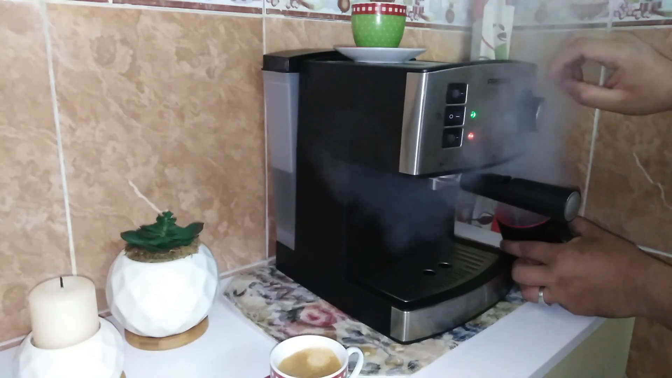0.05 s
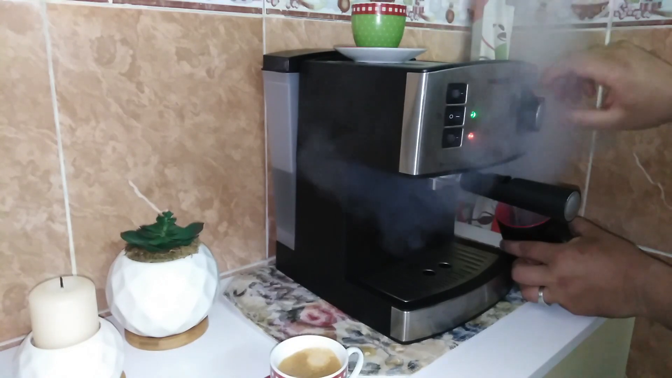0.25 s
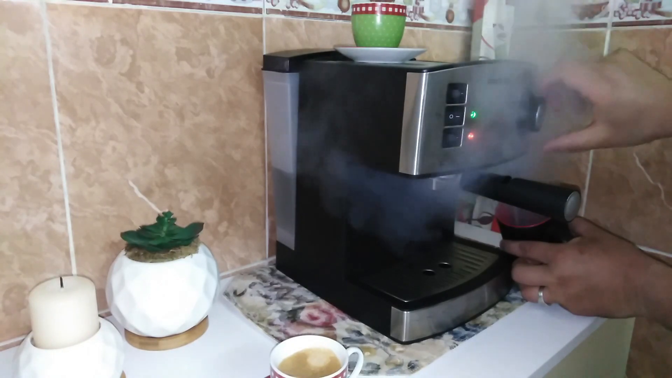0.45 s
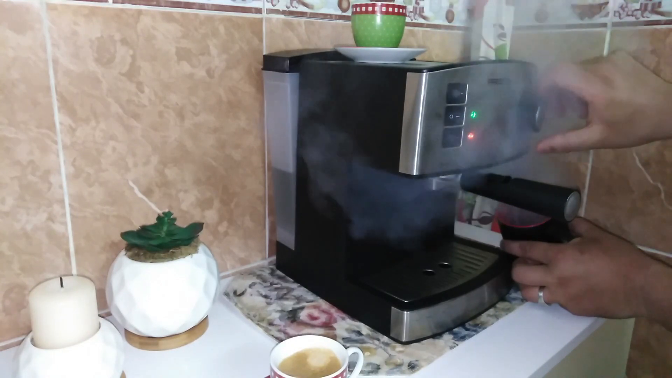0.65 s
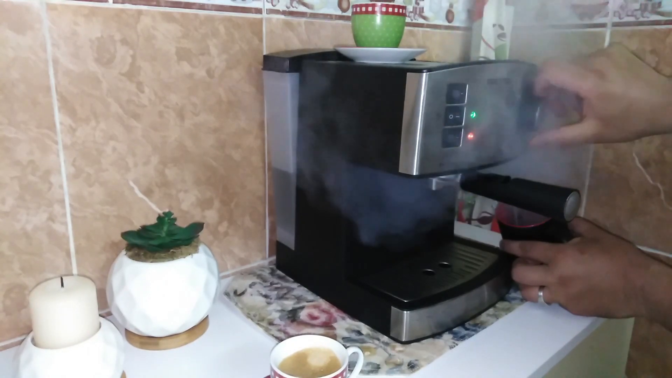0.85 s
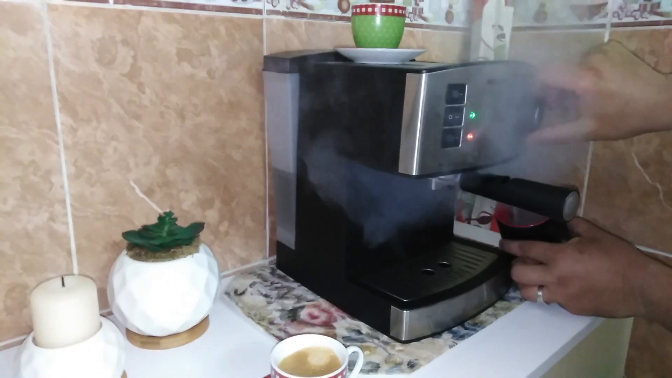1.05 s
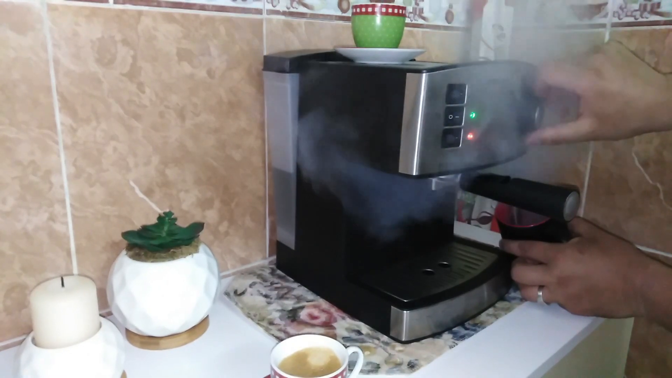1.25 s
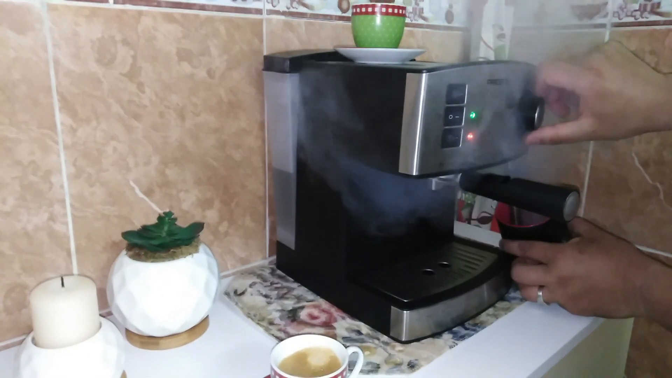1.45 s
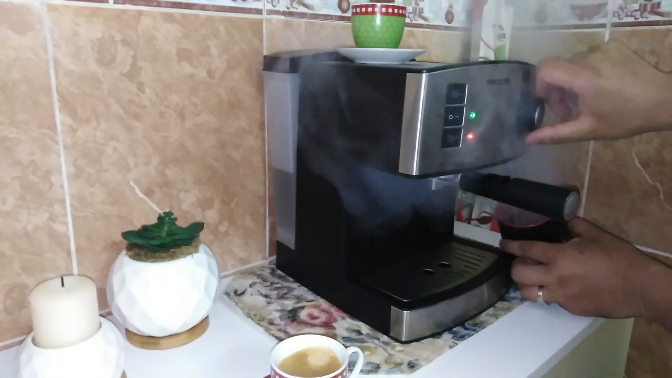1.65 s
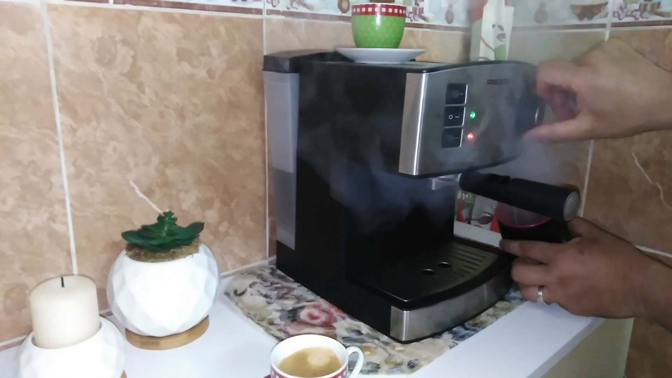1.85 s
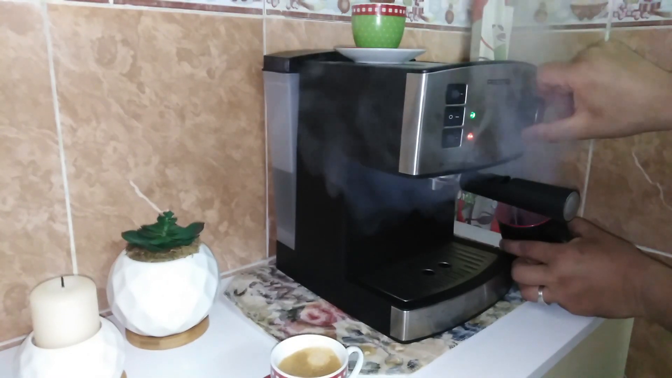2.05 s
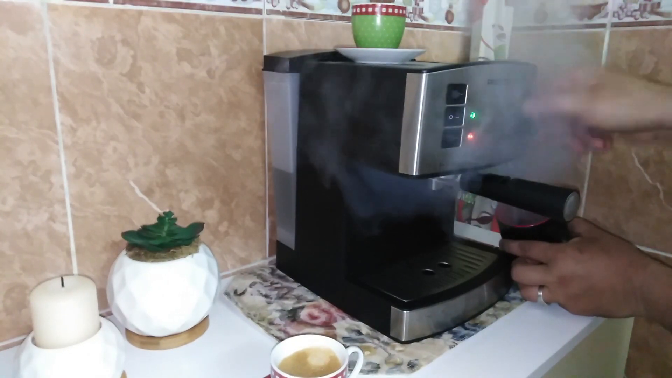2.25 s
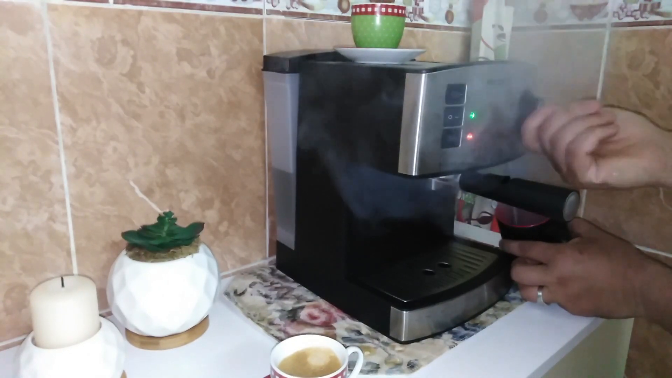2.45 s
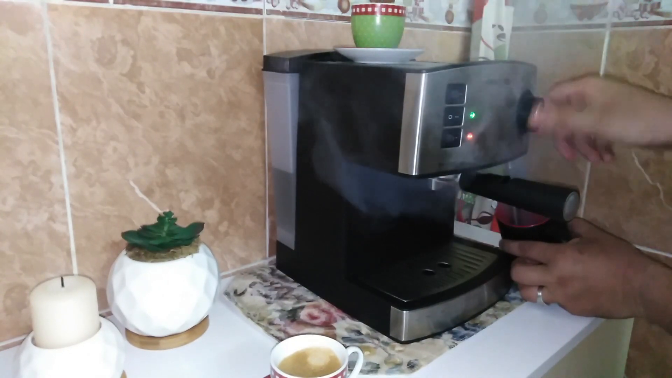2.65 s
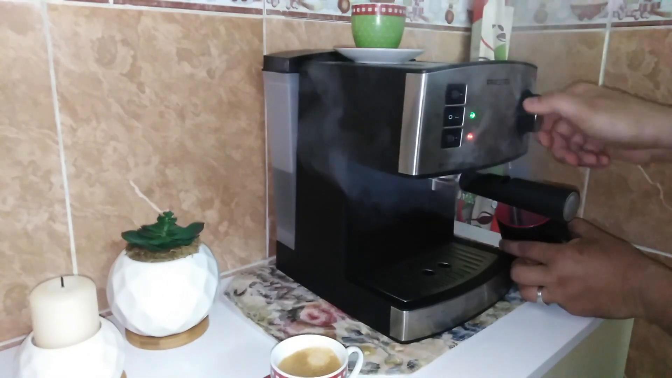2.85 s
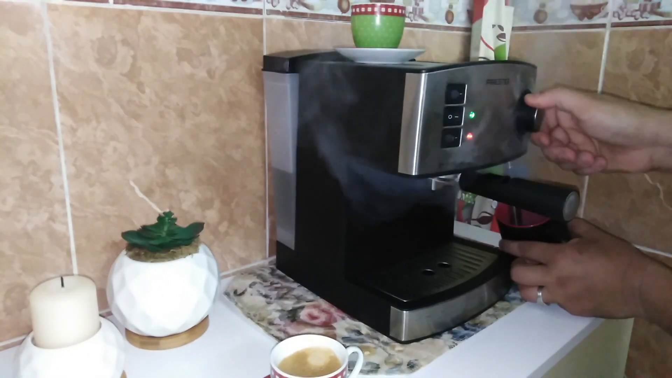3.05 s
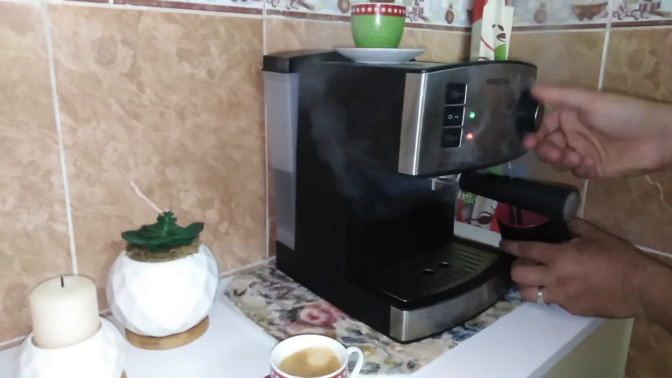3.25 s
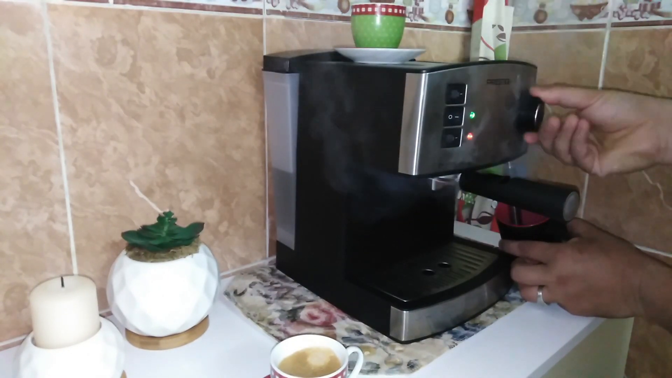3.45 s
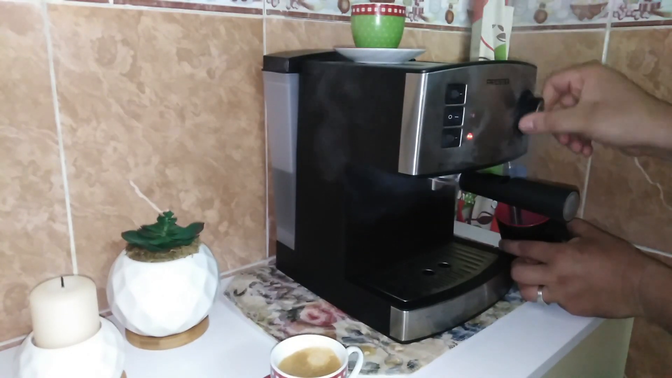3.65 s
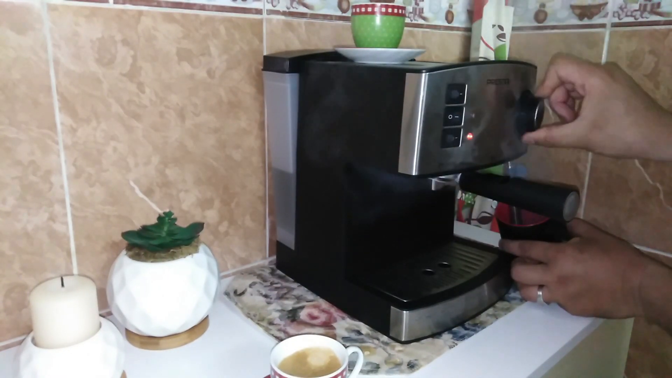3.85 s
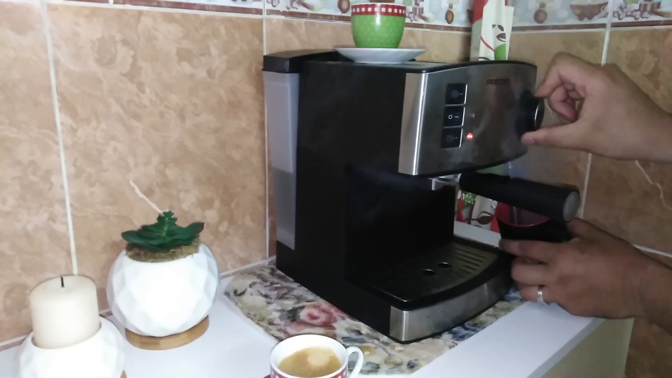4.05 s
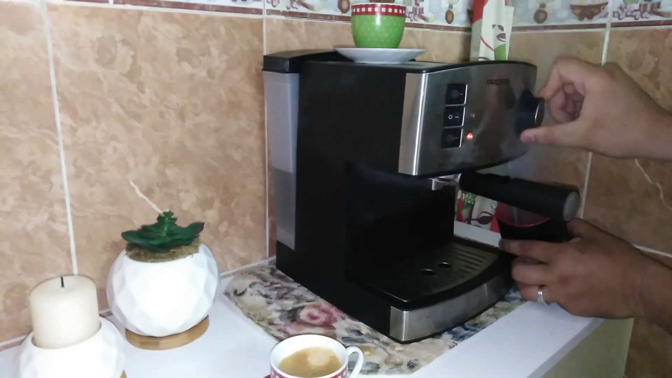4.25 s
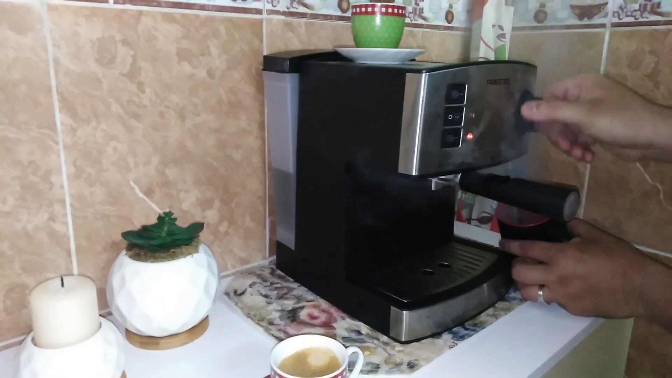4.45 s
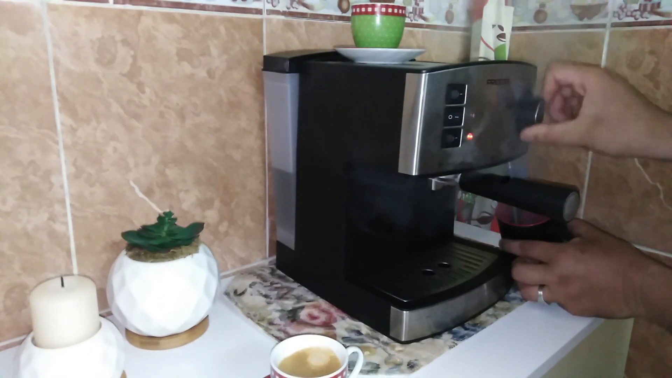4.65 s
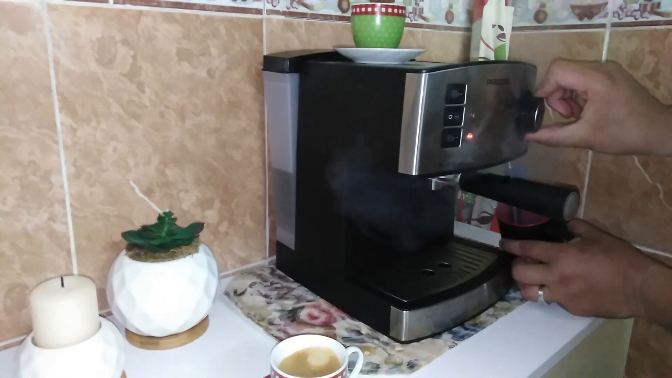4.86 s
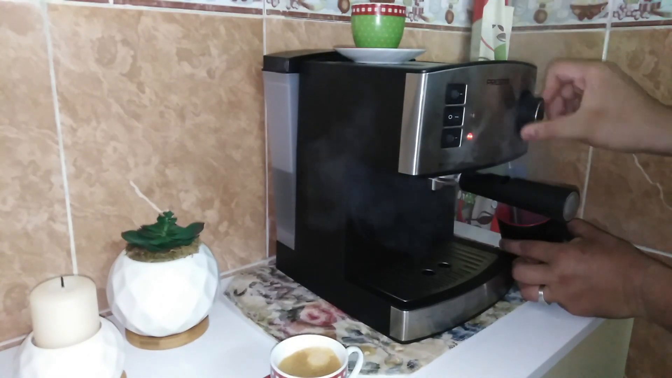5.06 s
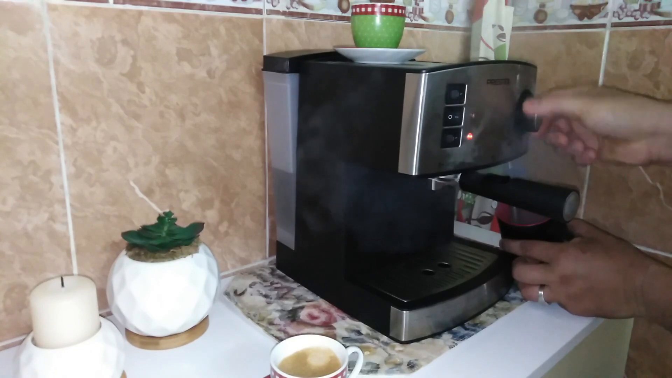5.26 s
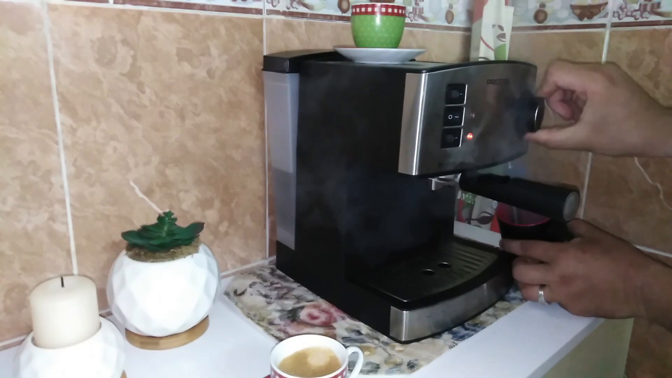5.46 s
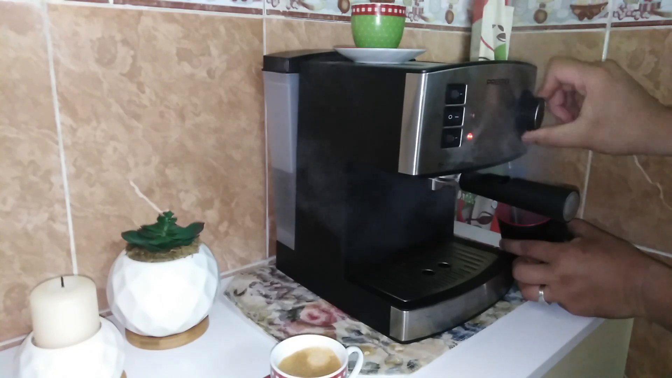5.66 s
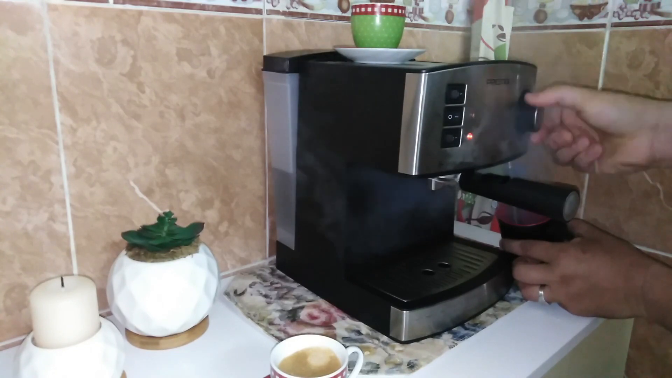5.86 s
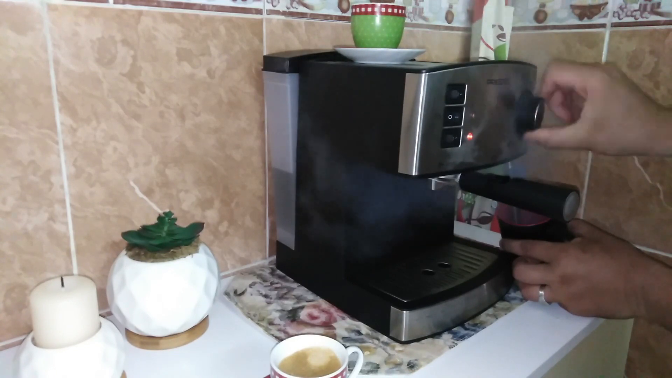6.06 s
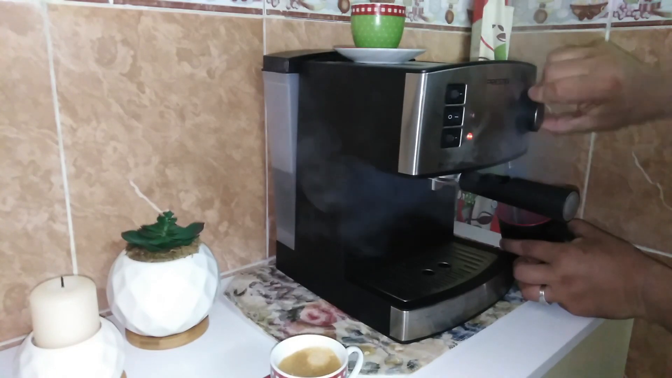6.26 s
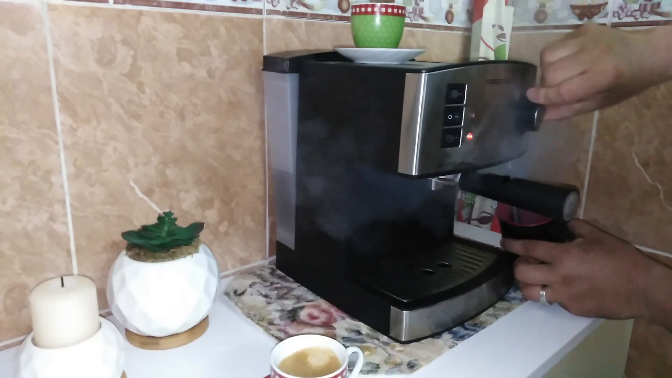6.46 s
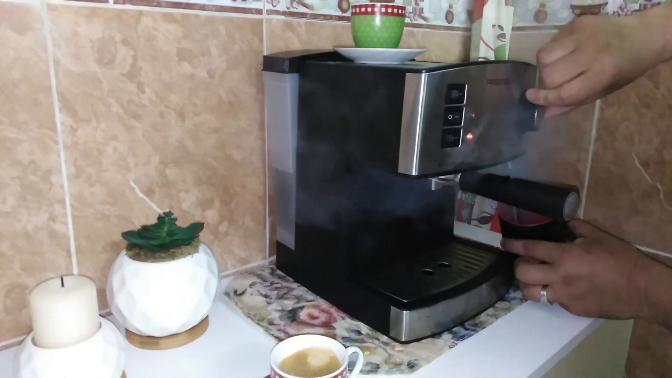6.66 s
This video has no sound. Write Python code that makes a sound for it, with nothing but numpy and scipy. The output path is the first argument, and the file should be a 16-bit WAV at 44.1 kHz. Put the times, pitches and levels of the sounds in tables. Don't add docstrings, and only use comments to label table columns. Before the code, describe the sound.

A loud steam jet hisses and whistles in a tiled kitchen, stops for dripping and a sharp knob snap, then returns in short bursts.

```python
import sys
import numpy as np
from scipy import signal
from scipy.fft import rfft, irfft, dct, next_fast_len
from scipy.io import wavfile
from scipy.ndimage import uniform_filter1d

SR = 44100
rng = np.random.default_rng(int(sys.argv[2]) if len(sys.argv) > 2 else 0)


def waveform_to_disk(signal):
    frames = np.transpose(np.atleast_2d(signal))
    scaled = np.clip(frames, -1, 1) * 32767
    samples = np.round(scaled).astype(np.int16)
    wavfile.write(sys.argv[1], SR, samples)


def convert_level_to_amplitude(level_db):
    exponent = np.asarray(level_db, float) / 20
    return 10 ** exponent


N = 295911
SNAP_S = 3.4368


def clock():
    return np.arange(N) / SR


def rms_one(x):
    return x / np.sqrt(np.mean(x ** 2) + 1e-20)


def at_hz(points, hz):
    table = np.array(points)
    return np.interp(np.log(hz + 1), np.log(table[:, 0]), table[:, 1])


def coloured(x, points, share=1):
    size = next_fast_len(x.shape[-1])
    hz = np.arange(size // 2 + 1) * SR / size
    spectrum = rfft(x, size) * convert_level_to_amplitude(share * at_hz(points, hz))
    return irfft(spectrum, size)[..., :x.shape[-1]]


def band_pass(x, band_hz, kind="band"):
    return signal.sosfilt(signal.butter(2, band_hz, kind, fs=SR, output="sos"), x)


def drift(rate):
    r = np.exp(-80 * np.pi * rate / SR)
    white = rng.standard_normal(N // 40 + 2002)
    slow = signal.lfilter([1], [1, -2 * r, r * r], white)[2000:]
    return np.interp(np.arange(N) / 40, np.arange(len(slow)), rms_one(slow))


def resonant_noise(modes, patchy_db):
    out, white = 0, rng.standard_normal((2, 3, N))
    for k, (hz, width_hz, level_db) in enumerate(modes):
        r = np.exp(-np.pi * width_hz / SR)
        poles = [1, -2 * r * np.cos(2 * np.pi * hz / SR), r * r]
        band = signal.lfilter([1, 0, -1], poles, white[k % 2])
        out = out + convert_level_to_amplitude(level_db + patchy_db * drift(19.4)) * rms_one(band)
    return out


def place(sound, start_s):
    out, at = np.zeros(N), round(start_s * SR)
    out[at:at + len(sound)] = sound[:N - at]
    return out


def ring(start_s, peak_db, hz, t60, rough=0, rise=0.00029):
    t = np.arange(round(.3 * SR)) / SR
    wobble = 1 + rough * uniform_filter1d(rng.standard_normal(len(t)), size=160) * 12
    envelope = convert_level_to_amplitude(peak_db - 60 * t / t60) * (1 - np.exp(-t / rise))
    return place(envelope * wobble * np.sin(2 * np.pi * hz * t), start_s)


def burst(start_s, peak_db, t60, band_hz):
    t = np.arange(round(.3 * SR)) / SR
    puff = convert_level_to_amplitude(peak_db - 60 * t / t60) * rng.standard_normal(len(t))
    return place(band_pass(puff, band_hz), start_s)


def hush():
    t = clock()
    from_s, fall_db_per_s = 3.17, 130
    return convert_level_to_amplitude(-fall_db_per_s * np.clip(t - from_s, 0, None) * (t < SNAP_S))


# open_s, unseat_time_s, shut_start_s, shut_time_s, jet_level_db
VALVE_TURNS = [
    (-1, .05, 2.37, .16, -8.9),
    (3.795, .02, 4.45, .025, -10.1),
    (4.714, .011, 5.165, .02, -9.8),
    (5.424, .004, 5.835, .02, -10),
    (6.098, .012, 7.5, .02, -10.3),
]


def flow(follows):
    t, out = clock(), 0
    unseat_share, full_s, sag_db_per_s = .6, .045, .7
    for opens, unseat_s, shuts, shutting_s, level_db in VALVE_TURNS:
        jump = np.clip((t - opens) / unseat_s, 0, 1)
        growth = np.clip((t - opens) / full_s, 0, 1) ** 2
        travel = unseat_share * jump + (1 - unseat_share) * growth
        closing = np.clip((shuts + shutting_s - t) / shutting_s, 0, 1) ** 2
        pressure = convert_level_to_amplitude(level_db - sag_db_per_s * (t - max(opens, 0)))
        out = out + travel ** follows * closing * pressure
    return out


# pitch_hz, level_db (per Hz)
RUMBLE_COLOUR = [(60, -33), (100, -16), (122, 2), (140, -3.5), (200, -6.5), (270, -12), (330, -14),
                 (430, -20), (520, -14), (700, -38.5)]
# pitch_hz, level_db (per Hz)
DEEP_COLOUR = [(15, -41), (30, -14), (45, -3.5), (60, 0), (80, 4.5), (110, -34)]
# peak_time_s, peak_db, length_s
SHUDDERS = [(0.0, -36, .02), (.2, -31, .06), (.4, -35, .1), (.64, -43, .06), (.9, -41, .05),
            (1.43, -40, .12), (2.06, -38, .06), (2.37, -39, .06), (2.6, -45, .1), (2.91, -43, .04),
            (2.97, -44, .04), (5.1, -37, .14), (6.15, -42, .04), (6.43, -44, .04), (5.7, -47, .15)]


def rumble():
    t = clock()
    opposite = np.array([[1], [-1]])
    mid, side = rms_one(coloured(rng.standard_normal((2, N)), RUMBLE_COLOUR))
    deep, deep_side = rms_one(coloured(rng.standard_normal((2, N)), DEEP_COLOUR))
    shudder = 0
    for peak_s, peak_db, length_s in SHUDDERS:
        span_s = length_s * np.where(t < peak_s, .4, 1)
        shudder = shudder + convert_level_to_amplitude(peak_db) * np.exp(-((t - peak_s) / span_s) ** 2)
    jet_on = flow(1) / flow(1).max()
    keep = np.exp(-1 / (.3 * SR))
    shaking = signal.lfilter([1 - keep], [1, -keep], jet_on, zi=[keep])[0]
    idle_db, shake_db, deep_db, shudder_deep_db = -56, -49, -63, -24
    steady = hush() * (convert_level_to_amplitude(idle_db) + convert_level_to_amplitude(shake_db) * shaking) * convert_level_to_amplitude(2.0 * drift(7.0))
    body = (steady + shudder) * convert_level_to_amplitude(-4.0 + 1.0 * drift(5.2)) * (mid + 0.23 * side * opposite)
    low = np.sqrt(hush()) * convert_level_to_amplitude(deep_db + 2.0 * drift(8.0)) + convert_level_to_amplitude(shudder_deep_db) * shudder
    return body + low * (deep + .45 * deep_side * opposite)


# pitch_hz, level_db (per Hz)
LEAK_COLOUR = [(200, -30), (350, -17), (721, -11.5), (838, -13.5), (1100, -17), (1420, -11.5), (1670, -22),
               (2280, -18.5), (6600, -33), (8000, -47), (10400, -68), (17600, -120)]


def leak():
    trickle = rms_one(coloured(rng.standard_normal((2, N)), LEAK_COLOUR)) * convert_level_to_amplitude(9.0 + 2.0 * drift(16))
    seep = coloured(rng.standard_normal((2, N)), JET_COLOUR)
    seep = rms_one(coloured(seep, [(10300, 0.5), (11500, -14)]))
    seep = seep * convert_level_to_amplitude(10.0 + 1.1 * drift(8.3))
    trickle_db, seep_db, fall_db, bleed_s = -54, -40, 58, .6
    pressure = 0
    for _, _, shuts, _, _ in VALVE_TURNS:
        since = clock() - shuts
        bled = 1 - np.exp(-np.abs(since) / bleed_s)
        pressure = pressure + (since > 0) * convert_level_to_amplitude(seep_db - fall_db * bled)
    return hush() * convert_level_to_amplitude(trickle_db) * trickle + pressure * seep


# start_s, peak_db, pitch_hz
KNOCKS = [(0.194, -28, 145), (0.377, -37, 145), (2.989, -24, 262), (3.47, -32, 290), (3.51, -33, 260),
          (3.69, -36, 270), (5.4, -36, 270), (4.691, -26.5, 264), (5.982, -27, 250), (6.002, -31, 253),
          (6.062, -29, 350)]
# pitch_hz, level_db, t60_s (time to fall 60 dB)
KNOB = [(340, -12, 0.054), (1153, -15.5, 0.089), (1974, -4, .025), (2520, 6, 0.011), (2980, 8, 0.0092),
        (4340, -8, 0.01), (5380, -6, 0.01), (7060, -16, .01)]


def hand():
    snap_db = -13
    knocks = sum(ring(s, peak_db, hz, 0.056, rough=.5, rise=.005) for s, peak_db, hz in KNOCKS)
    snap = sum(ring(SNAP_S, snap_db + db - 8.5, hz, t60, rough=0.3) for hz, db, t60 in KNOB)
    crack = burst(SNAP_S, snap_db - 1.5, .045, (1500, 5000))
    crack = crack + burst(SNAP_S, snap_db - 19, .3, (250, 4000))
    tick = burst(3.538, -30, .04, (3500, 12000))
    return knocks + snap + crack + tick


# start_s, peak_db, pitch_hz, metal_ping_db, thud_db
DROPS = [(2.5437, -30.5, 1435, 3, -4), (2.6503, -26.5, 1590, 3.5, -5), (2.7245, -32, 1344, -7, 1),
         (2.808, -23.5, 1454, -14, -24), (2.8969, -25, 1305, -0.5, -9), (2.9195, -25, 1390, -32, -13),
         (2.9771, -25, 1525, -5, -16), (3.0433, -41, 1600, 10, -4), (3.0722, -22.5, 1444, -10.5, -17),
         (3.1163, -42, 1440, -14, -2), (3.1625, -41, 1390, -7.5, -22.5), (3.2604, -64.5, 1450, 15.5, 24),
         (3.3298, -45, 1500, -7, -7), (3.4106, -50, 1410, -12, -7.5), (3.494, -32, 1416, -21, -29),
         (3.566, -23.5, 1445, -10.5, -19), (3.638, -49, 1440, -3, -13), (3.674, -25, 1433, -17, -18),
         (3.7433, -25.5, 1410, -12, -24), (5.3672, -31, 1423, -1.5, -7), (6.038, -35, 1434, 0.5, -2)]
# pitch_hz, level_db, t60_s (time to fall 60 dB)
PINGS = [(2480, 0, .1), (3300, -6, .05), (4600, -11, .2), (5600, -12, .04), (7450, -5, .08)]


def drops():
    out = np.zeros(N)
    for s, peak_db, hz, ping_db, thud_db in DROPS:
        out += ring(s, peak_db - 0.8, hz, 0.075, rough=0.45, rise=0.0034)
        out += ring(s, peak_db + thud_db + 4.5, 780, 0.035, rough=1.0, rise=.004)
        out += burst(s, peak_db + min(ping_db, 3.0) - 4.5, .14, (500, 3000))
        for wall_hz, wall_db, t60 in PINGS:
            wall_peak_db = peak_db + ping_db + wall_db - 9.5 + rng.normal(0, 0.78)
            out += ring(s, wall_peak_db, wall_hz, t60, rough=1.0, rise=0.0011)
    return out


# pitch_hz, level_db (per Hz)
JET_COLOUR = [(1120, -52), (1900, -23), (2250, -24), (2400, -13), (3180, -4.5), (3670, -12), (3960, -3),
              (4640, -4.5), (5230, 1), (6960, -12.7), (9750, -3), (11000, -13), (13200, -10), (14200, -16)]
# pitch_hz, width_hz, level_db
JUG_MODES = [(540, 60, -19), (690, 50, -9), (817, 56, 0.5), (913, 38, 1), (998, 180, -6), (1233, 65, -2.5),
             (1491, 97, -7.5), (1814, 560, -14)]
# pitch_hz, width_hz, level_db
WHISTLES = [(2468, 49, -26.5), (2825, 104, -22), (3065, 42, -31), (4476, 150, -25), (5084, 50, -23),
            (5417, 260, -18.5), (10160, 84, -25), (14200, 200, -30)]
# pitch_hz, width_hz, level_db
LATE_WHISTLE = [(5660, 130, 0)]


def jet():
    level = flow(1) * convert_level_to_amplitude(.15 * drift(3.0))
    boom = flow(.6) * convert_level_to_amplitude(-14.8 + 1.5 * drift(14))
    hiss = rms_one(coloured(rng.standard_normal((3, N)), JET_COLOUR))
    hiss = hiss * convert_level_to_amplitude(1.0 * drift(25) + 0.5 * drift(9.3))
    hiss = rms_one(hiss + resonant_noise(WHISTLES, patchy_db=3.0) * convert_level_to_amplitude(5.5))
    shift_s = 3.1
    hiss = hiss - .42 * (clock() > shift_s) * band_pass(hiss, (3400, 5450))
    late_db = np.where(clock() < shift_s, -26, -11.5)
    hiss = hiss + convert_level_to_amplitude(late_db) * resonant_noise(LATE_WHISTLE, patchy_db=2.0)
    jug = band_pass(resonant_noise(JUG_MODES, patchy_db=2.0), 520, "high")
    return (level * hiss + boom * rms_one(jug)) / np.sqrt(3)


# pitch_hz, t60_s (time to fall 60 dB)
KITCHEN_RING = [(100, 0.15), (1000, 0.53), (5000, 0.37), (14000, 0.3)]
# pitch_hz, level_db
WET = [(300, -0.5), (800, -4.5), (1500, -0.5), (3000, 1), (5300, 3), (7000, 4.5), (10000, -2.5),
       (14000, 3.5)]


def kitchen(sources, wet_db, right_lag):
    t = np.arange(round(.6 * SR)) / SR
    tail, edges = 0, 60 * 2 ** np.arange(9)
    for low, high in zip(edges, edges[1:]):
        band = band_pass(rng.standard_normal((len(sources), 2, len(t))), [low, high])
        decay = convert_level_to_amplitude(-60 * t / at_hz(KITCHEN_RING, np.sqrt(low * high)))
        band = band * decay * np.clip((t - .002) / 0.0078, 0, 1)
        tail = tail + rms_one(band) * np.sqrt((high - low) * 2 / SR / len(t))
    tail = convert_level_to_amplitude(wet_db) * coloured(tail, WET)
    lag = np.array([[0], [right_lag]])
    tail[..., :64] += np.sinc(np.arange(64) - 16 - lag) * np.hanning(64) * 2
    before = np.concatenate([sources[:, len(t):0:-1], sources], axis=1)
    start = len(t) + 16
    wet = signal.fftconvolve(before[:, None], tail, axes=2)[..., start:start + N].sum(axis=0)
    return coloured(wet, [(hz, -10 * np.log10(1 + convert_level_to_amplitude(2 * (db + wet_db)))) for hz, db in WET])


# pitch_hz, left_minus_right_db
LEAN = [(270, 2.5), (440, 3), (720, 6), (1170, 2), (1930, 1), (3160, 2), (4300, 1), (5000, -2.5),
        (5600, 4.5), (6400, 2.5), (8520, -3.5), (14000, 0)]


def scene():
    left, right = kitchen(jet(), wet_db=2.5, right_lag=3.5)
    steam = np.array([coloured(left, LEAN, .5), coloured(right, LEAN, -.5)])
    small = kitchen((drops() + hand())[None], wet_db=-5, right_lag=1.3)
    small = small * convert_level_to_amplitude(np.array([[-1.2], [1.6]]))
    small = band_pass(small, 11000, "low")
    return steam + small + leak() + rumble()


# pitch_hz, step_db
STEP = [(300, -25), (1500, -8), (2200, 1), (2900, -1), (3700, 4), (5200, 0), (6300, 4), (7300, 7),
        (9500, 3), (11300, 7), (13000, 6), (14200, 3)]
# pitch_hz, step_db
HEARING_FLOOR = [(500, -80), (1500, -72), (3500, -62), (4800, -61), (5600, -70), (6500, -60), (10000, -66),
                 (11000, -52), (14000, -50)]


def phone_rounding(x):
    size, half, pad = 1024, 512, 300
    frames = (N + pad) // size + 2
    x = np.pad(x, ((0, 0), (size + pad, (frames + 1) * size - N - size - pad)))
    window = np.sin(np.pi * (np.arange(2 * size) + .5) / (2 * size))
    blocks = x.reshape(2, -1, size)
    slices = np.concatenate([blocks[:, :-1], blocks[:, 1:]], axis=2) * window
    a, b, c, d = np.split(slices, 4, axis=2)
    folded = np.concatenate([-c[..., ::-1] - d, a - b[..., ::-1]], axis=2)
    lines = dct(folded, type=4, norm="ortho")
    hz = (np.arange(size) + .5) * SR / (2 * size)

    def by_band(v):
        return v.reshape(frames, -1, 8).mean(axis=2).repeat(8, axis=1)

    power = np.mean(lines ** 2, axis=0)
    whim = uniform_filter1d(rng.standard_normal((frames, size // 8)), size=4, axis=0)
    whim_db = 6 * whim.repeat(8, axis=1)
    nearby = np.sqrt(uniform_filter1d(power, size=70, axis=1))
    step = by_band(nearby * convert_level_to_amplitude(at_hz(STEP, hz))) * convert_level_to_amplitude(whim_db)
    block_power = np.mean(blocks ** 2, axis=(0, 2)) + 1e-12
    quieter = np.minimum(block_power, np.roll(block_power, 1))[:-1]
    attack = block_power[1:] > 8 * quieter
    step[attack | np.roll(attack, 1)] *= .03
    step = np.maximum(step, convert_level_to_amplitude(at_hz(HEARING_FLOOR, hz)))
    rounded = np.sign(lines) * step * np.floor(np.abs(lines) / step + .4)
    keep = by_band(power) > (.4 * step) ** 2
    top_hz = 14200 - 350 * (uniform_filter1d(rng.standard_normal(frames), size=3) > .55)
    u = dct(rounded * keep * (hz < top_hz[:, None]), type=4, norm="ortho")
    first, second = u[..., :half], u[..., half:]
    slices = np.concatenate([second, -second[..., ::-1], -first[..., ::-1], -first], axis=2) * window
    out = slices[:, :-1, size:] + slices[:, 1:, :size]
    return out.reshape(2, -1)[:, pad:pad + N]


def low_pass(x):
    return signal.sosfilt(signal.butter(12, 14590, fs=SR, output="sos"), x)


def record(dry):
    mix = np.clip(phone_rounding(dry), -1, 1)
    return low_pass(mix)


dry = scene()
out = record(dry)
waveform_to_disk(out)
```